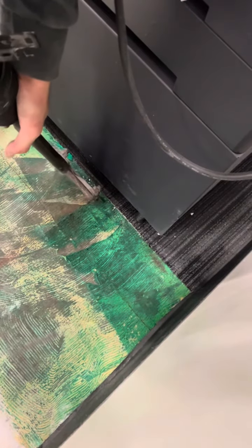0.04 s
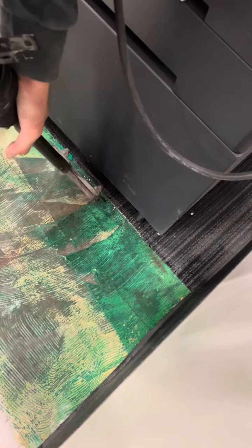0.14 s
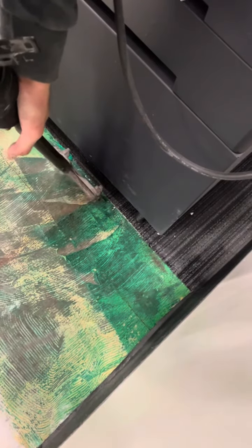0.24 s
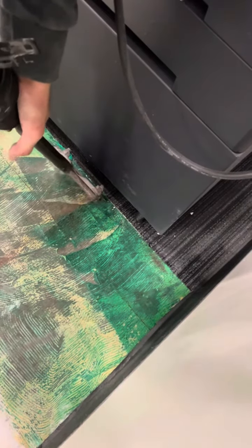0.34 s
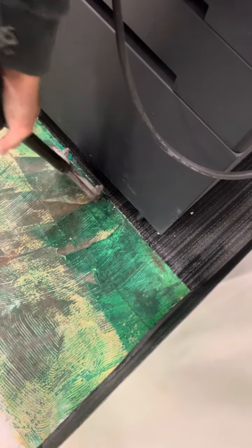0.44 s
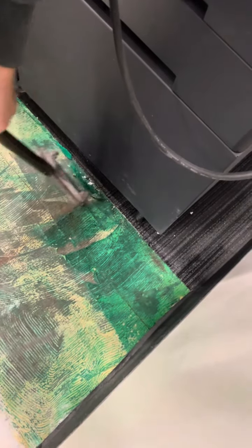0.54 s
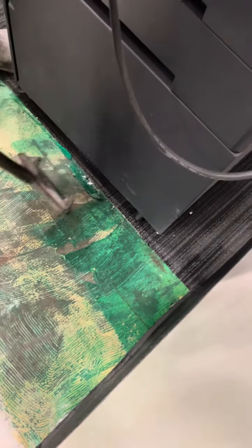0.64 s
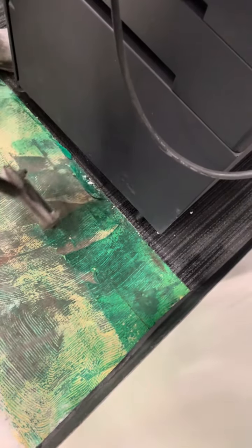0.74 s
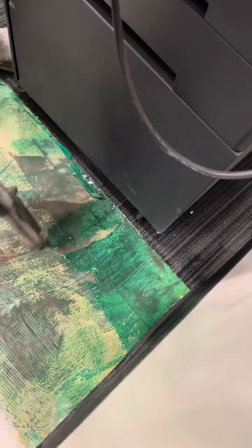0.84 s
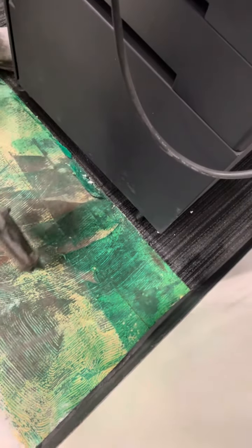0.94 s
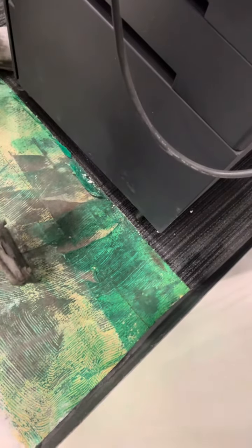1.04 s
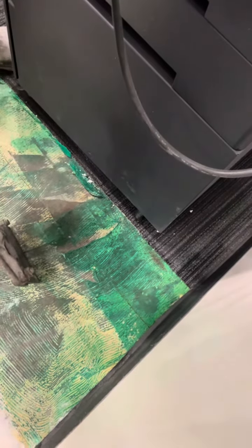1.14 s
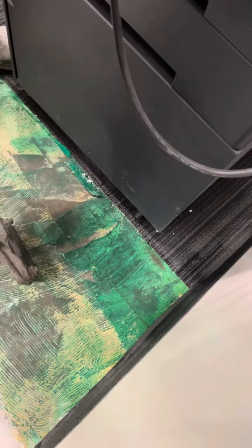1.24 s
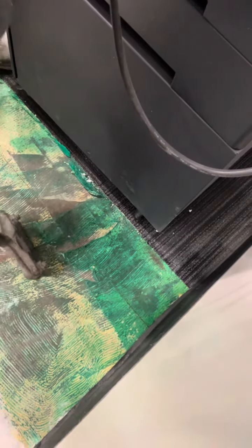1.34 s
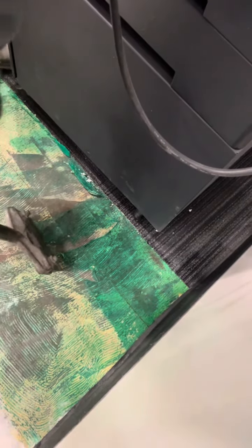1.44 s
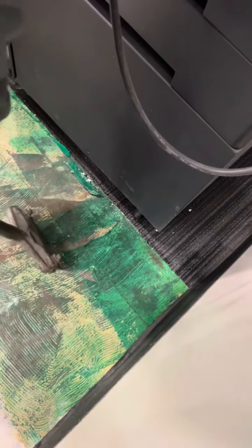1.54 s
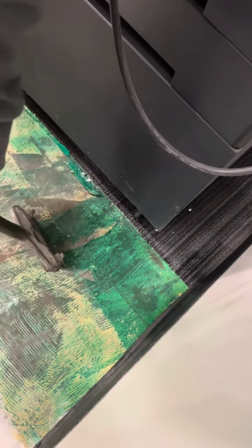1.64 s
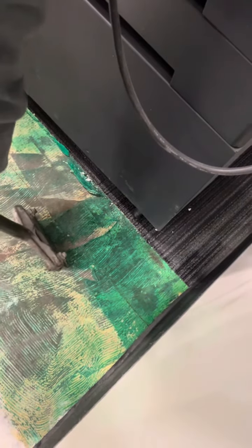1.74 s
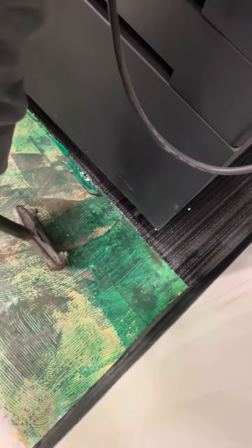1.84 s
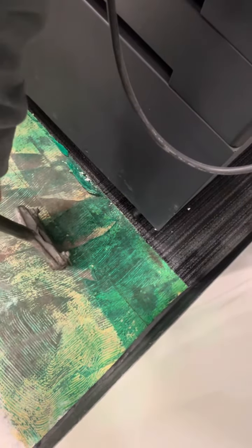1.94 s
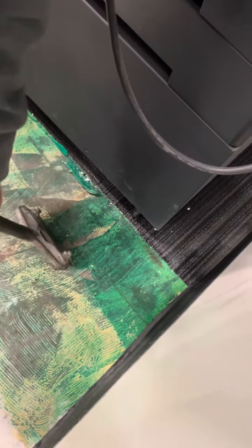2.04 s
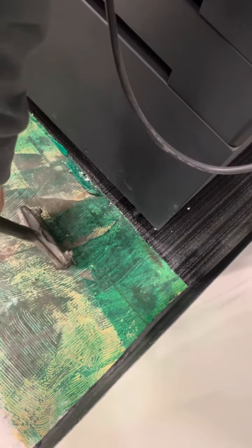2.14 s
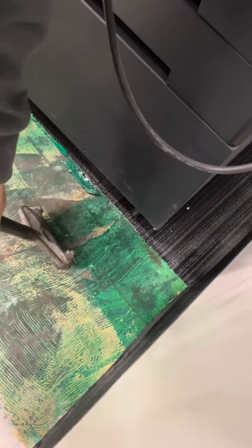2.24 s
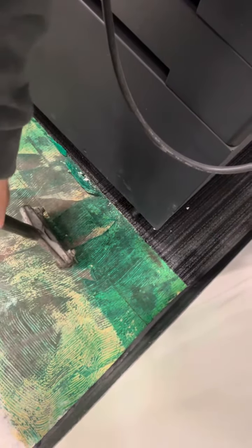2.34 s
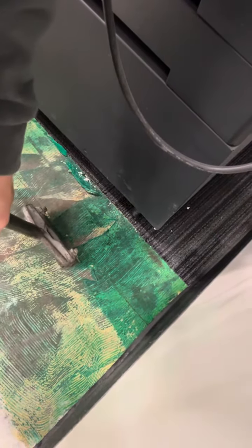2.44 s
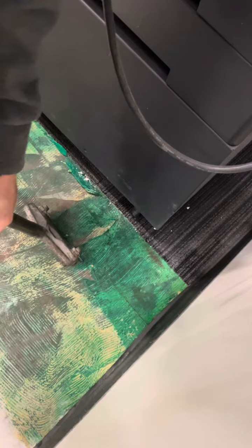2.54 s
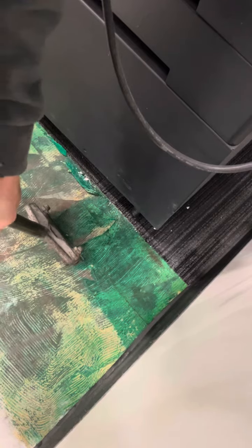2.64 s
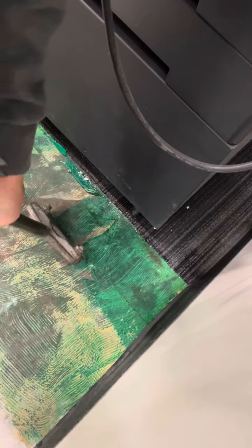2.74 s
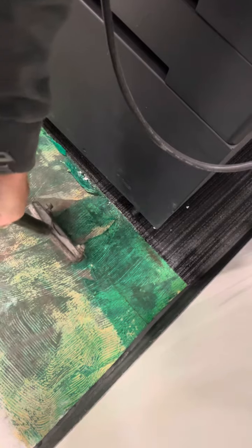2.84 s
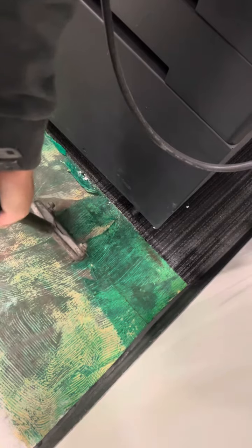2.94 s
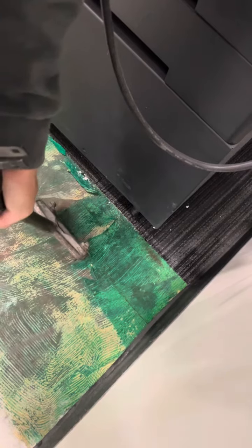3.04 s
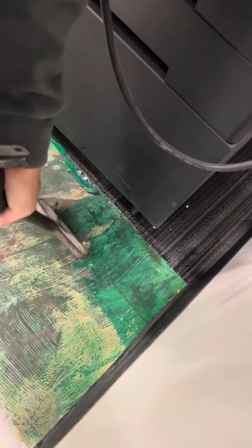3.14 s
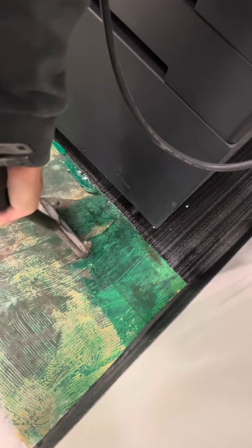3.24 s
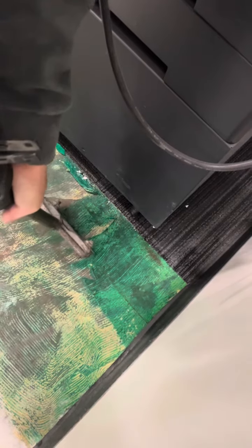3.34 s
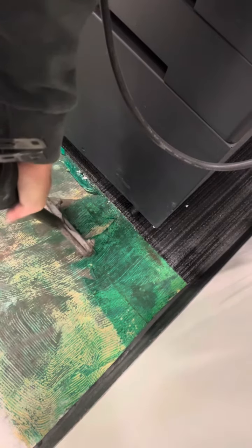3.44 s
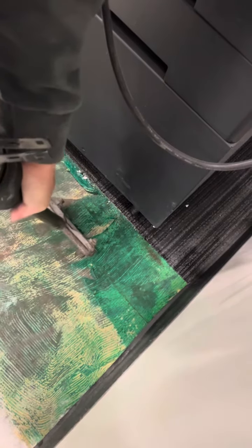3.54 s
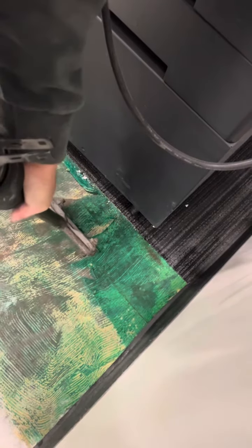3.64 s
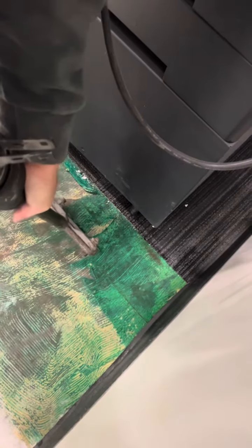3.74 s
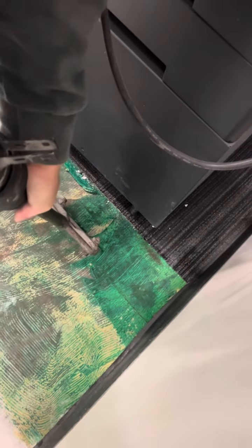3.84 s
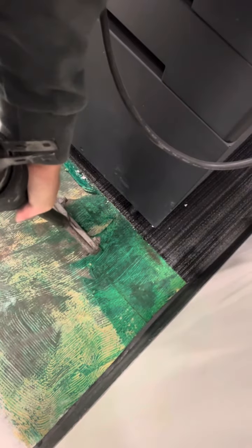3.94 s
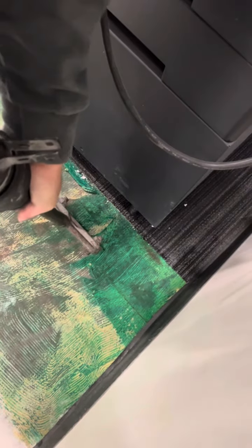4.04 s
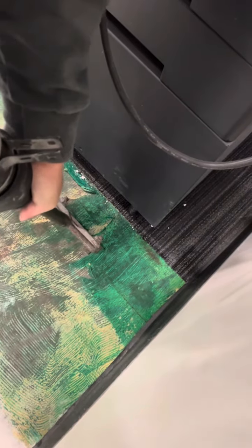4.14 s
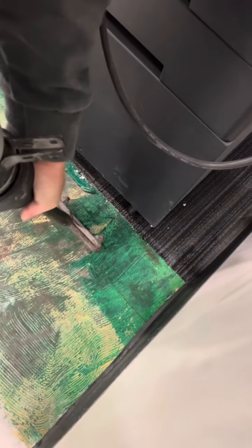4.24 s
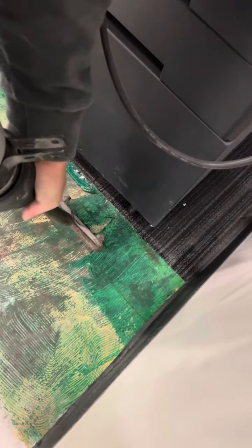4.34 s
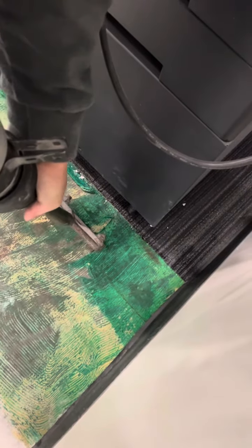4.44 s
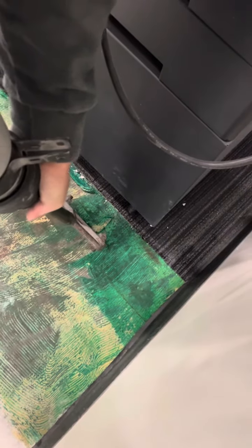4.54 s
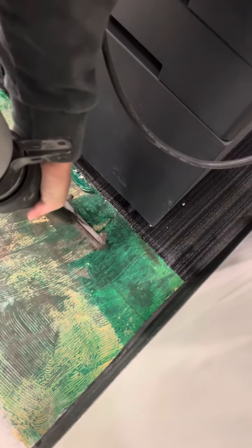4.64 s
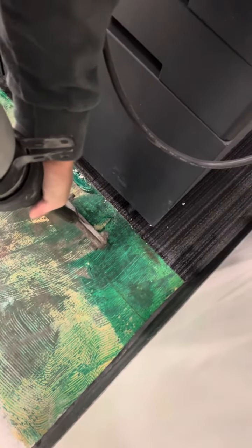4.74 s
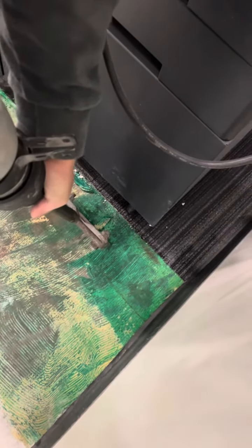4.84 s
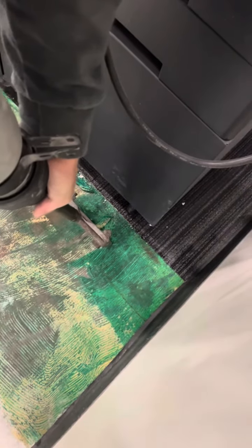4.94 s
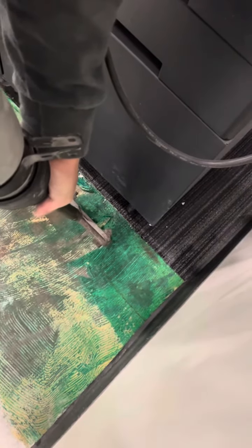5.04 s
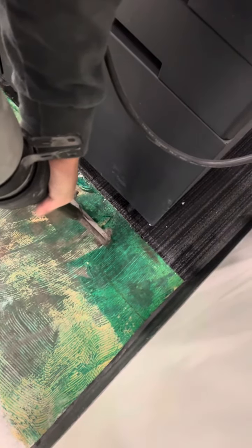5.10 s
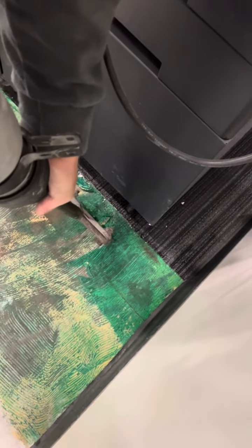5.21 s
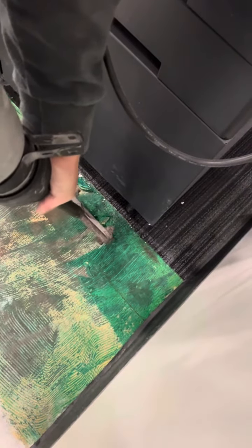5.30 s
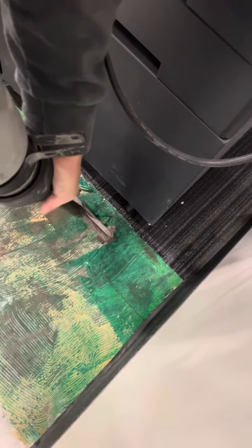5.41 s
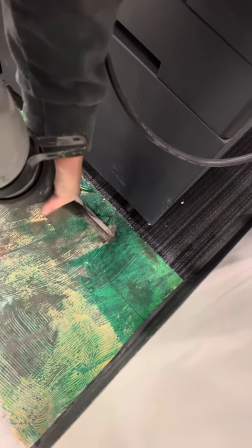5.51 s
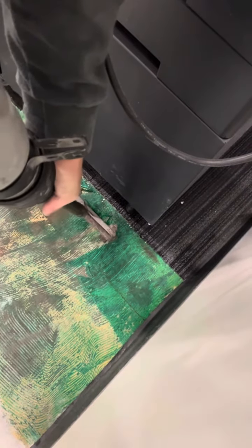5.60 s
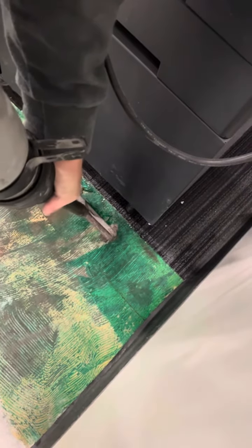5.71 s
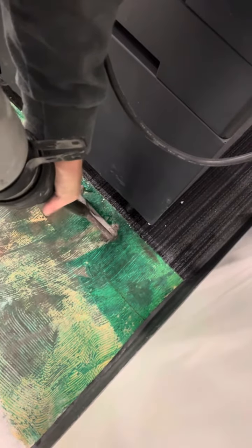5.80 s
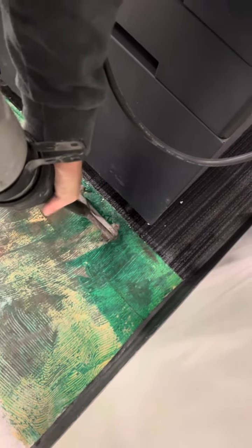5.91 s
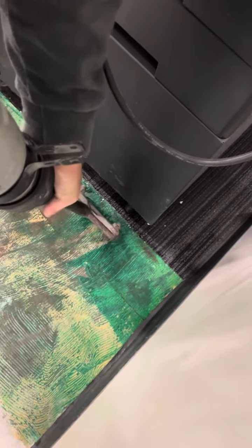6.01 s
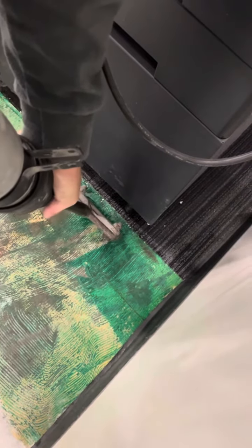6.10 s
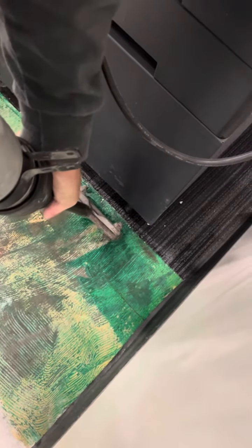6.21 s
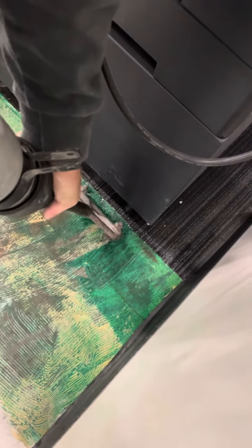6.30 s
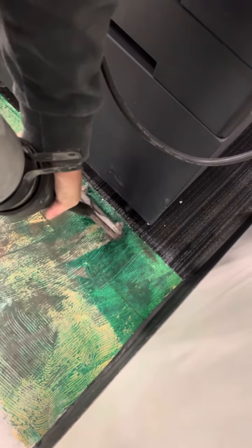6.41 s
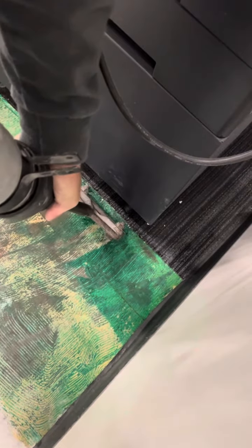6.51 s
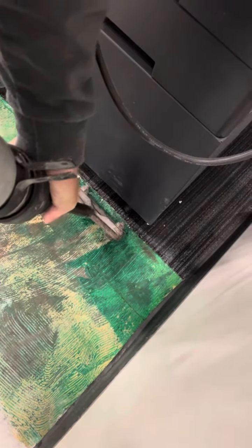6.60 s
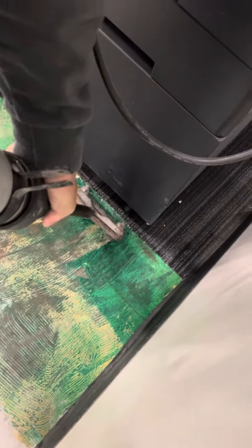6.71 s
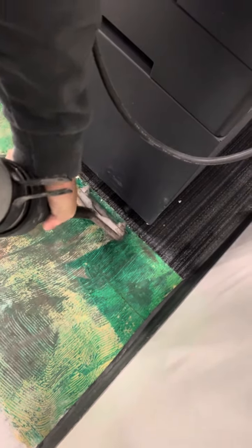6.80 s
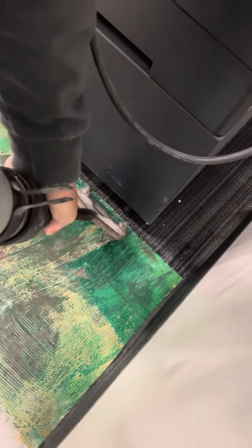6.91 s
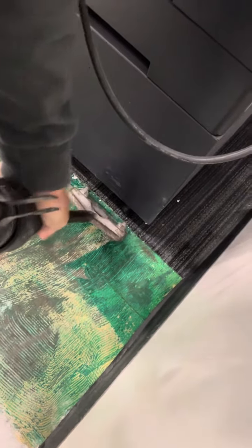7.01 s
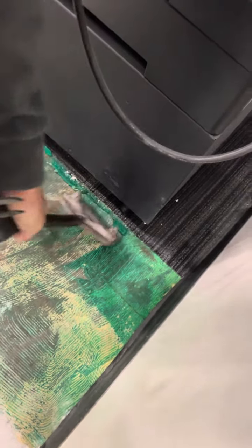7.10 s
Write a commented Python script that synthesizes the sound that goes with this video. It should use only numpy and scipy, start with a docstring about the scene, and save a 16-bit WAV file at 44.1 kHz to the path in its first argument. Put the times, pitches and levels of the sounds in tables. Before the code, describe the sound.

Indoors, close to an electric chipping hammer, a thin bright chatter of scraper blade on concrete stops after under half a second. The lifted tool's fan rushes and whines, then the blade lands with a loud thud and sharp tick. A long stroke follows at about fifty blows a second, steel ringing and glue crunching, with small bumps, until the tool lifts at the end.

```python
"""An electric chipping hammer drives a scraper blade under old glue on a concrete floor, indoors.
About 49 blows a second make the steel shank ring, the blade clack, the glue crunch and the floor hum.
Ringing is built from fading sine waves; crunch, scratch and fan rush are noise shaped by tables.
A light, glancing stroke ends, the lifted tool's motor and fan are heard, the blade lands with a thud,
and one long stroke follows until the tool is lifted again. Bumps, skids and scuffs come in between."""
import sys
import numpy as np
from scipy import signal
from scipy.fft import rfft, irfft, next_fast_len
from scipy.io import wavfile
from scipy.ndimage import uniform_filter1d, map_coordinates

SR = 44100
rng = np.random.default_rng(int(sys.argv[2]) if len(sys.argv) > 2 else 0)


def output_pcm(signal):
    """Save a mono or channel-first signal as 16-bit PCM at the path in sys.argv[1].

    Samples are clipped to [-1, 1] before scaling.
    """
    pcm = np.clip(np.atleast_2d(signal).T, -1, 1) * 32767
    wavfile.write(sys.argv[1], SR, np.round(pcm).astype(np.int16))


N = 315756
TIME = np.arange(N) / SR   # seconds
FFT_SIZE = next_fast_len(N)
BLOWS_PER_S = 49.45   # beat of the long stroke
# the blade leaves the floor, lands, and leaves it again
LIFT_S, LAND_S, END_S = 0.416, 1.055, 7.04
CONTACT_FADE_S, LAST_FADE_S = 0.015, 0.063
# in the glancing stroke only the edge touches: its bright ring grows while the blade's clack fades
GLANCING_CHANGE_DB_PER_S = 11
# held loosely, each blow takes up to this much longer to build
LOOSE_RISE_S = 0.0016
# colour of the low rumble: f/Hz, relative level per Hz/dB
RUMBLE_COLOUR = [(25, -38), (65, -9), (110, -25), (250, -7), (500, -14.5), (1000, 2), (3000, -44)]


def hammering():
    """Every blow drives shank, blade, housing, glue and floor together."""
    # how the blade leans on the floor: t/s, looseness (0 to 1)
    lean = [(1.2, 0.59), (1.7, 0.69), (2.15, 0.96), (2.4, 0.82), (2.8, 0.52), (3.2, 0.67), (3.65, 1),
            (4.35, 0.35), (5.0, 0.27), (6.1, 0.39), (6.6, 0.69)]
    # how deep the edge bites into the glue: t/s, crunch level/dB, scratch level/dB (both before the grind gain)
    bite = [(1.08, -42.5, -39), (1.14, -32, -33), (1.2, -30, -33), (1.26, -34.5, -38), (1.34, -35, -36.5),
            (1.43, -37.5, -41), (1.53, -38.5, -37.5), (1.66, -37.5, -36.5), (1.82, -40, -38.5),
            (2.15, -43.5, -39), (2.58, -45, -43), (3.96, -38.5, -37.5), (4.98, -38, -38),
            (5.13, -44, -39.5), (5.18, -40.5, -40.5), (5.53, -41, -42.5), (5.79, -39.5, -39.5),
            (6.3, -46.5, -44), (6.62, -47.5, -41.5), (6.85, -44, -43), (7.02, -44, -43.5)]
    [loose] = in_time(lean)
    bite_db, scratch_db = in_time(bite)
    bite_db = by_stroke(-60.5, bite_db)
    scratch_db = by_stroke(-56.5, scratch_db)
    blow, age = striker(jitter_ms=0.025)
    rise_s = 0.0014 + LOOSE_RISE_S * loose

    steel = shank(blow, age, loose)
    scrape = grind(blow, age, rise_s, bite_db, scratch_db) + bright_edge(blow, age, rise_s)
    scrape = room(scrape, t60=0.14, wet_db=-14)
    hum_db = bite_db - 15.5   # the floor's hum follows the bite
    return steel + clack(blow, age) + scrape + floor(age, hum_db)


def striker(jitter_ms):
    """The motor's speed gives a little with the load; finds the latest blow and its age in s at each sample."""
    # how far the blows fall off the beat: t/s, lateness/ms
    beat_lag = [(1.06, .2), (1.13, -1.4), (1.2, -5.1), (1.3, -5.1), (1.5, -3.2), (1.8, -2.1), (2.3, -2),
                (2.9, -.8), (3.5, -.8), (4.2, -1), (5.2, -.7), (5.8, -.9), (6.3, -2), (6.6, -2.2),
                (6.9, -2.2), (7.03, 0)]
    glancing = np.arange(-0.009, LAND_S - 2 / BLOWS_PER_S, 1 / 48.75)   # first blow in s, 48.75 blows per s
    long = np.arange(1.0544, N / SR, 1 / BLOWS_PER_S)
    lag_ms = np.interp(long, *np.transpose(beat_lag))
    beats = np.concatenate([glancing, long + lag_ms / 1000])
    falls = beats + jitter_ms * rng.standard_normal(len(beats)) / 1000
    blow = np.searchsorted(falls, TIME, side="right") - 1
    return blow, TIME - falls[blow]


def shank(blow, age, loose):
    """The shank rings until the blade bites; held loosely it rings longer and is damped less."""
    # the ringing shifts with the seat in the chuck:
    # t/s, main f/Hz, upper f/Hz, upper level/dB, lower level/dB (both against the main tone)
    seat = [(.4, 4210, 4430, -19, -21), (1.15, 4292, 4580, -18, -18), (1.55, 4228, 4590, -13.5, -19),
            (2.05, 4176, 4460, -12, -19), (2.4, 4300, 4530, -10, -10), (3.05, 4254, 4660, -11.5, -26),
            (3.65, 4174, 4730, -14, -9), (4.0, 4300, 4740, -12, -6.5), (4.3, 4330, 4700, -13, -11),
            (4.85, 4253, 4820, -25, -31), (6.1, 4256, 4900, -19, -23), (6.8, 4267, 4690, -12, -12)]
    # pressure on the tool, as the level of the shank's ring: t/s, level/dB
    pressure = [(1.07, -32.5), (1.17, -20.5), (1.5, -20.5), (1.7, -24.5), (2.72, -31), (3.0, -25),
                (3.61, -31), (4.2, -24.5), (5.03, -21.5), (6.16, -25), (6.62, -30.5), (6.81, -29),
                (7.02, -36), (7.04, -43)]
    main_hz, upper_hz, upper_db, lower_db = in_time(seat)
    lower_hz, t60_s = 3964, 0.12
    [level_db] = in_time(pressure)
    level_db = by_stroke(-49.5, level_db)

    # time from the blow to the bite, a little different for each blow
    flight_s = (0.0043 + 0.006 * loose ** 2) * (1 + 0.09 * per_blow(blow))
    bitten = 0.5 + 0.5 * np.tanh((age - flight_s) / 0.0014)
    choke = 1 - bitten * (1 - 0.36 * loose)
    rise_s = 0.0015 + LOOSE_RISE_S * loose
    free = (1 - np.exp(-(age / rise_s) ** 2)) * choke

    main = ring(blow, age, [(main_hz, 0, t60_s)], uneven_db=0.85, wander_db=-2.5)
    side_modes = [(upper_hz, upper_db, t60_s), (lower_hz, lower_db, t60_s)]
    sides = ring(blow, age, side_modes, uneven_db=2.1, wander_db=-0.5)
    steel = free * (main + sides)
    ear_lag_s = 0.00003   # the right ear hears it later
    late = map_coordinates(steel, [np.arange(N) - ear_lag_s * SR], order=3)
    return from_db(level_db) * even(room(np.array([steel, late]), t60=0.45, wet_db=-20))


def clack(blow, age):
    """Blade and housing start together on each blow, so their tones beat into a knock and a weaker afterknock."""
    # the blade's tones shift with its angle: t/s, main f/Hz, upper level/dB against the main tone
    blade_pitch = [(1.2, 950, 0), (1.6, 940, 19), (2.2, 990, 20), (2.8, 924, -3), (4.9, 884, -8),
                   (5.55, 998, -7), (6.0, 952, -14), (6.4, 1080, -25), (6.85, 1020, -2), (7, 946, -7)]
    # steady tones, before filtering: f/Hz, relative level/dB, time to fade by 60 dB/s
    steady_blade = [(1035, -13, 0.035)]
    housing_modes = [(675, 0, 0.04)]
    # level of the knocking before the room: t/s, blade level/dB, housing level/dB
    knock = [(1.1, -59, -67), (1.23, -41, -40.5), (1.26, -44, -46), (2.3, -50.5, -52.5), (2.98, -43, -43),
             (4.7, -37, -43.5), (5.39, -42.5, -57), (5.74, -35, -47), (6.34, -42, -67), (6.45, -41.5, -51),
             (6.9, -38.5, -52.5), (7.03, -44.5, -46.5)]
    blade_db, housing_db = in_time(knock)
    blade_db = by_stroke(-49.5 - GLANCING_CHANGE_DB_PER_S * TIME, blade_db)
    housing_db = by_stroke(-67, housing_db)

    main_hz, upper_db = in_time(blade_pitch)
    main_hz = main_hz * (1 + 0.012 * per_blow(blow))
    blade_modes = [(main_hz, 0, 0.024), (1188, upper_db, 0.03)] + steady_blade
    blade = band(ring(blow, age, blade_modes, uneven_db=0.54, wander_db=-3.0), 761, 1016)
    housing = band(ring(blow, age, housing_modes, uneven_db=1.1, wander_db=0.0), 715, 930)
    knocks = from_db(blade_db) * even(blade) + from_db(housing_db) * even(housing)
    return room(knocks, t60=0.2, wet_db=-19)


def grind(blow, age, rise_s, bite_db, scratch_db):
    """The glue crunches and scratches on each blow; dug in hard, the scraper's plate rings out more."""
    # colours of the noise: f/Hz, relative level per Hz/dB
    crunch_colour = [(50, -12), (450, -12), (1150, 5), (1400, -7.5), (1700, -11), (2100, -0.5), (2430, 2.5),
                     (2750, -3), (3050, 1.5), (3350, 0.5), (3800, 6), (4300, 2), (5500, -11), (15500, -70)]
    scratch_colour = [(1500, -64), (3600, -35), (4400, 7.5), (4850, 2), (5150, -3.5), (5600, 2),
                      (6000, -4.5), (6250, -0.5), (6600, 3.5), (7300, -7.5), (7800, -3.5), (9000, -40),
                      (11500, -25.5), (15500, -41)]
    # thin ringing of the plate as it flexes: f/Hz, relative level/dB, time to fade by 60 dB/s
    plate_modes = [(2450, -7, 0.029), (3017, 5, 0.026), (3632, 3.5, 0.037), (6020, 4, 0.042),
                   (6170, -11.5, 0.074)]
    crunch = from_db(bite_db) * burst(blow, age, crunch_colour, rise_s=rise_s, fall_s=0.004, rest=0.09,
                                      alike=0.55, uneven_db=1.7, grit_db=3)
    scratch = from_db(scratch_db) * burst(blow, age, scratch_colour, rise_s=rise_s, fall_s=0.0045, rest=0.08,
                                          alike=0.68, uneven_db=1.4, grit_db=2.8)
    grit = from_db(1.73) * patchy(crunch + scratch, patchy_db=2.0, rate=7.6)
    # extra 0.3 dB for each dB of bite above its usual -40 dB
    plate_db = bite_db + 0.3 * np.maximum(bite_db + 40, 0)
    return grit + from_db(plate_db) * upper_ring(blow, age, plate_modes)


def bright_edge(blow, age, rise_s):
    """The edge gives a bright crack of noise on each blow and rings with thin tones of its own."""
    # colour of the crack: f/Hz, relative level per Hz/dB
    bright_colour = [(2300, -49), (3900, -13.5), (4900, -27), (6400, -19), (7450, -32), (8050, 0.5),
                     (8600, 4), (9000, -1.5), (9550, -1), (10800, -14.5), (11900, -33), (12500, -15.5),
                     (13700, -38), (15500, -27)]
    # the edge's own ring: f/Hz, relative level/dB, time to fade by 60 dB/s
    edge_modes = [(8450, 2.5, 0.037), (8610, -2, 0.18), (9720, -8, 0.12)]
    # level of crack and ring together, before the room: t/s, level/dB
    brightness = [(1.08, -34.5), (1.21, -30), (1.38, -36.5), (2.8, -35.5), (2.89, -37.5), (4.73, -37),
                  (6.18, -41.5), (7.03, -38)]
    [bright_db] = in_time(brightness)
    bright_db = by_stroke(-33.5 + GLANCING_CHANGE_DB_PER_S * TIME, bright_db)
    crack = burst(blow, age, bright_colour, rise_s=by_stroke(0.0014, 0.7 * rise_s),
                  fall_s=by_stroke(0.007, 0.0046), rest=0.09, alike=0.72, uneven_db=1.4, grit_db=2.2)
    return from_db(bright_db) * even(crack + upper_ring(blow, age, edge_modes))


def ring(blow, age, modes, uneven_db, wander_db):
    """Struck tones fade after each blow; their strengths differ by blow and wander as the blade moves."""
    total = 0
    for hz, db, t60 in modes:
        level_db = db + uneven_db * per_blow(blow) + wander_db * drift(0.4) - 60 * age / t60
        total = total + from_db(level_db) * np.sin(2 * np.pi * hz * age)
    return total


def upper_ring(blow, age, modes):
    """Thin upper tones, struck on every blow, with a soft start."""
    return (1 - np.exp(-age / 0.0014)) * ring(blow, age, modes, uneven_db=2.6, wander_db=2.5)


def burst(blow, age, spectrum, rise_s, fall_s, rest, alike, uneven_db, grit_db):
    """A crack on each blow, then a gritty drag: partly a slowly changing repeated rattle, partly fresh grit."""
    source, fresh = noise(spectrum, size=SR), noise(spectrum)
    # each blow replays the same piece of noise, blending into the next piece 2.19 times a second
    turn = TIME * 2.19
    place = (np.floor(turn) * 2000 + age * SR).astype(int)
    blend = turn % 1 * np.pi / 2
    rattle = np.cos(blend) * source[:, place % SR] + np.sin(blend) * source[:, (place + 2000) % SR]
    alike = np.clip(alike, 0, 1)   # share of the crack's power that repeats
    crack = (1 - np.exp(-(age / rise_s) ** 2)) * np.exp(-age / fall_s)
    crack = crack * from_db(uneven_db * per_blow(blow))
    drag = rest * from_db(grit_db * drift(85))
    return even(crack * np.sqrt(alike) * rattle + (crack * np.sqrt(1 - alike) + drag) * fresh)


def floor(age, hum_db):
    """The slab hums on the low multiples of the beat and rumbles as the tool shifts."""
    # hum of the floor: multiple of the beat, relative level/dB
    hum_tones = [(2, -1.5), (3, -0.5), (4, 0.5), (5, -12), (6, -4), (7, -7.5), (8, -5)]
    hum = 0
    for multiple, db in hum_tones:
        hz = multiple * BLOWS_PER_S
        level_db = db + swell_db(hz) + 1.3 * drift(1.5)
        hum = hum + from_db(level_db) * np.sin(2 * np.pi * hz * age)
    rumble = from_db(1.0 + 2.3 * drift(7.3)) * noise(RUMBLE_COLOUR)
    return from_db(hum_db) * (from_db(-2.5) * hum + rumble)


def swell_db(hz):
    """The floor's hum swells around one pitch at a time; gives the rise in dB at the pitch asked for."""
    # t/s, length to either side/s, centre f/Hz, rise/dB
    hum_swells = [(3.15, .12, 99, 7), (3.8, 0.16, 164, 13), (4.43, 0.066, 294, 10), (5.526, 0.11, 184, 10),
                  (6.49, 0.16, 198, 6.5)]
    total_db = 0
    for s, length, centre_hz, db in hum_swells:
        octaves = np.log2(hz / centre_hz)
        total_db = total_db + db * np.exp(-((TIME - s) / length) ** 2 - (octaves / 0.35) ** 2)
    return total_db


def motor(fan_db, wobble):
    """The fan rushes, chopped once per armature turn and shifting in colour; armature and gears whine."""
    # tones of the whine: f/Hz, level/dB, rate of the wobble/Hz (levels before motor_level)
    whine = [(304.4, -47.5, 10), (679, -51, 40), (908, -51, 25), (1185, -51, 60), (2160, -52, 70),
             (2260, -53, 70), (3435, -53, 160), (4860, -49, 160), (9195, -54, 45)]
    # colour of the rush: f/Hz, relative level per Hz/dB
    fan_colour = [(30, -19), (200, -8.5), (400, -5), (950, 7), (1800, 2), (2400, 6.5), (3200, 5.5),
                  (3800, 9.5), (4400, 4), (5400, 8), (6800, 2), (8300, -8), (11000, -25), (12300, -6),
                  (14500, -42)]
    tones = 0
    for hz, db, rate in whine:
        gain = from_db(db + 2.5 * drift(6)) * np.sqrt(2)
        tones = tones + gain * np.sin(2 * np.pi * hz * TIME + wobble * drift(rate))
    turn_hz = whine[0][0]
    chop_db = 2.5 * np.sin(2 * np.pi * turn_hz * TIME) + 1.2 * drift(75)
    rush = patchy(from_db(fan_db + chop_db) * noise(fan_colour), patchy_db=2.2, rate=18)
    # the whine builds a moment after the fan
    return rush + step(LIFT_S + 0.081, 0.05) * tones


def motor_level():
    """Level of the fan rush and whine: heard after each lift, fading after the landing, faint in the strokes."""
    rise_s, fade_s = 0.0082, 0.12
    first = step(LIFT_S + 0.016, rise_s) * np.exp(-np.maximum(TIME - LAND_S, 0) / fade_s)
    last = from_db(-7.5) * step(END_S + 0.063, rise_s)
    return first + last + from_db(-27.5)


def bumps(spread, dying):
    """A bump spreads out in the slab: the highs come first and the pitch sinks as 1 / age."""
    # the tool bumps on the floor, before the dulling filter: t/s, level/dB, contact time/ms
    floor_bumps = [(0.446, -37.5, 4.8), (1.0332, -2, 1.3), (1.041, -31, 5), (1.214, -38, 9.8),
                   (1.401, -34.5, 6.4), (1.727, -40, 4.7), (2.399, -56.5, 8), (2.889, -55, 5.6),
                   (3.361, -46, 3.5), (4.494, -43, 2.6), (4.582, -36.5, 4.8), (4.655, -37, 3.8),
                   (4.76, -41, 2.9), (4.844, -46, 1.4), (4.885, -42, 2.4), (4.925, -47, 2),
                   (5.125, -62, 4.1), (5.653, -50, 2.6), (7.104, -31.5, 3.1)]
    # the sharp tick as the blade lands: t/s, level/dB, contact time/ms
    landing_tick = (1.0352, -4, 0.26)

    def bump(s, db, contact_ms):
        """One bump: a sine wave whose pitch sinks while it dies away."""
        u = np.maximum(TIME - s, 1e-9) * 1000 / contact_ms   # age in contact times
        shape = 2 * u ** 2 / (1 + u ** (2 + dying)) * np.exp(-u / 20)
        return from_db(db) * shape * np.sin(2 * np.pi * spread * np.log(u))

    dull = signal.butter(6, 800, fs=SR, output="sos")   # the slab's answer stays below about 800 Hz
    thuds = sum(bump(*row) for row in floor_bumps)
    return signal.sosfilt(dull, thuds + 1e-18) + bump(*landing_tick)


def swing():
    """A low rush of noise grows as the lifted tool swings back, until the blade lands."""
    # colour of the rush: f/Hz, relative level per Hz/dB
    swing_colour = [(30, -32), (80, -10), (130, -22), (230, -13), (330, 5), (720, -3), (1100, 5),
                    (2500, -43)]
    growth = np.exp(np.minimum(TIME - LAND_S, 0) / 0.24)
    in_air = step(LIFT_S, CONTACT_FADE_S) - step(LAND_S, CONTACT_FADE_S)
    return from_db(-35.5) * growth * in_air * noise(swing_colour)


def skids():
    """Short scratches of noise as the edge skids over grit, leaving the floor or coming down."""
    # level before the room: t/s, level/dB, length to either side/s
    skid_times = [(0.47, -32, 0.008), (1.008, -26, 0.005), (1.022, -26.5, 0.006)]
    # colour: f/Hz, relative level per Hz/dB
    skid_colour = [(50, 8), (400, 3), (850, 9.5), (1500, -3), (4000, -4), (9000, 6.5), (12000, -22),
                   (16000, -14)]
    return room(rubs(skid_times, skid_colour), t60=0.068, wet_db=-5.5)


def scuffs():
    """Dull rubs of noise as the tool is shoved along."""
    # t/s, level/dB, length to either side/s
    scuff_times = [(2.08, -59, 0.089), (3.36, -54.5, 0.025), (3.98, -50, 0.12), (4.8, -61, 0.15),
                   (5.72, -64, 0.05), (6.98, -60, 0.058)]
    # colour: f/Hz, relative level per Hz/dB
    scuff_colour = [(30, -10), (130, -8), (230, 1), (480, 4), (700, -25), (2000, -44)]
    return rubs(scuff_times, scuff_colour)


def rubs(rows, spectrum):
    """Short rubs of one colour, each swelling and dying away."""
    return noise(spectrum) * sum(from_db(db) * np.exp(-((TIME - s) / length) ** 2) for s, db, length in rows)


def room(x, t60, wet_db):
    """Dense reflections off walls and furniture, weak in the bass: a fading noise tail after 4 ms."""
    # f/Hz, relative level per Hz/dB
    colour = [(100, -34), (600, 21.5), (1500, 6.0), (9000, 8.5), (16000, -50.0)]
    delay = TIME[:SR // 2]
    tail = noise(colour, size=len(delay)) * from_db(-60 * delay / t60) * (delay > 0.004)
    tail = tail / np.sqrt(np.sum(tail ** 2) / 2)
    return x + from_db(wet_db) * signal.oaconvolve(np.atleast_2d(x), tail, axes=1)[:, :N]


def background():
    """A faint, steady rumble of low noise."""
    return from_db(-72) * noise(RUMBLE_COLOUR)


def noise(spectrum, size=FFT_SIZE):
    """Coloured stereo noise, alike in the bass and wide in the treble."""
    # stereo width: f/Hz, side against mid level/dB
    width = [(350, -54), (700, -66), (1100, -4.5), (1600, 8), (2600, 7), (4300, 6), (6500, -2.5), (9000, 1),
             (15000, 3)]
    mid, side = rfft(rng.standard_normal((2, size))) * gain_by_bin(spectrum, size)
    side = side * gain_by_bin(width, size)
    return rms_one(irfft([mid + side, mid - side], size)[:, :N])


def gain_by_bin(points, size):
    """A table of f/Hz and level/dB as a gain for every frequency bin."""
    hz, db = np.transpose(points)
    bins = np.arange(size // 2 + 1) * SR / size
    return from_db(np.interp(np.log(bins + 1), np.log(hz), db))


def patchy(x, patchy_db, rate):
    """The colour of a sound shifts slowly: each of 11 overlapping bands drifts in level by itself."""
    centres = np.geomspace(900, 7500, 11)   # Hz
    bins = np.arange(FFT_SIZE // 2 + 1) * SR / FFT_SIZE
    spectrum = rfft(x, FFT_SIZE)
    total = 0
    for pick in np.eye(len(centres)):
        part = irfft(spectrum * np.interp(bins, centres, pick), FFT_SIZE)[:, :N]
        total = total + part * from_db(patchy_db * drift(rate))
    return total


def drift(rate):
    """A random curve with spread 1 that changes little faster than the rate in Hz."""
    hz = np.fft.rfftfreq(16384, 32 / SR)   # one point every 32 samples
    slow = rms_one(irfft(rfft(rng.standard_normal(16384)) / (1 + (hz / rate) ** 4)))
    return np.interp(np.arange(N) / 32, np.arange(len(slow)), slow)


def per_blow(blow):
    """One random draw with spread 1 for each blow, held until the next."""
    return rng.standard_normal(blow.max() + 1)[blow]


def even(x):
    """Hold the level steady, dividing by the average level over about six blows."""
    power = uniform_filter1d(np.atleast_2d(x).mean(0) ** 2, size=int(6 * SR / BLOWS_PER_S))
    return x / np.sqrt(np.abs(power) + 1e-12)


def band(x, low_hz, high_hz):
    """Keep what lies between two frequencies."""
    return signal.sosfilt(signal.butter(2, [low_hz, high_hz], "band", fs=SR, output="sos"), x)


def step(at_s, width_s):
    """A smooth rise from 0 to 1 around a moment."""
    return 0.5 + 0.5 * np.tanh((TIME - at_s) / width_s)


def by_stroke(glancing, long):
    """One value for the glancing stroke, another for the long one, switching while the tool is lifted."""
    return np.where(TIME < (LIFT_S + LAND_S) / 2, glancing, long)


def in_time(rows):
    """Each column of a curve at every sample."""
    s, *columns = np.transpose(rows)
    return [np.interp(TIME, s, c) for c in columns]


def from_db(db):
    """Decibels to gain."""
    return 10 ** (np.asarray(db) / 20)


def rms_one(x):
    """Scale so that the average of the channels has an effective (rms) level of 1."""
    return x / np.sqrt(np.mean(np.atleast_2d(x).mean(0) ** 2) + 1e-20)


def scene():
    """The tool hammers on the floor; fan rush and whine are heard after each lift, over a faint background."""
    pressed = 1 - step(LIFT_S, CONTACT_FADE_S) + step(LAND_S, CONTACT_FADE_S) - step(END_S, LAST_FADE_S)
    tool = pressed * hammering() + motor_level() * motor(fan_db=-33.0, wobble=0.73)
    contacts = bumps(spread=1.21, dying=1.36) + skids() + scuffs()
    return tool + contacts + swing() + background()


def record(dry):
    """Peaks stop at full scale, then a steep filter cuts the top above 15900 Hz."""
    top_cut = signal.ellip(10, 0.1, 80, 15900, fs=SR, output="sos")
    return signal.sosfilt(top_cut, np.clip(dry, -1, 1))


dry = scene()
out = record(dry)
output_pcm(out)
```